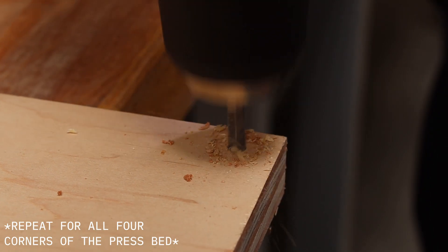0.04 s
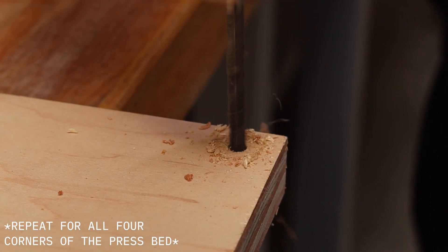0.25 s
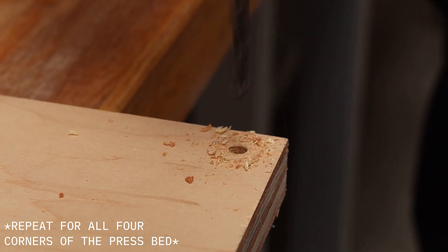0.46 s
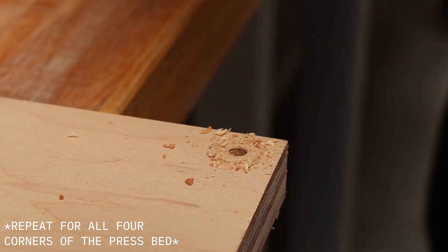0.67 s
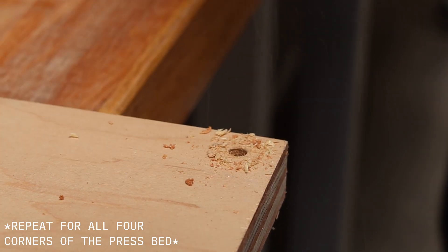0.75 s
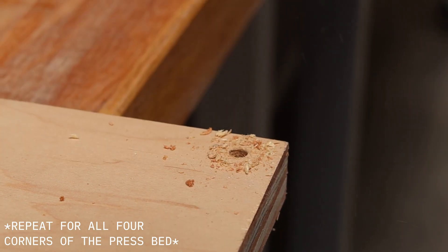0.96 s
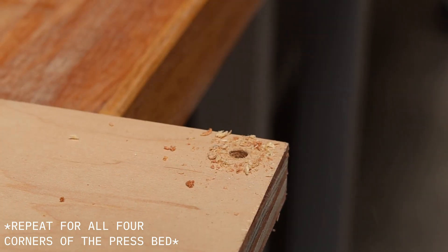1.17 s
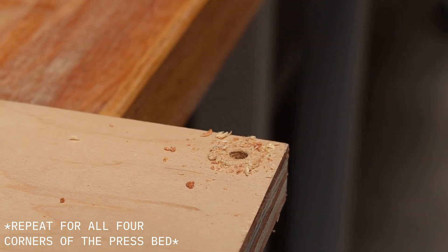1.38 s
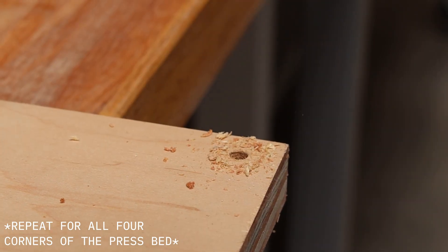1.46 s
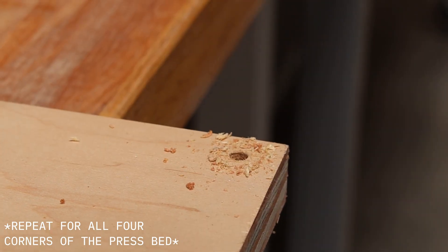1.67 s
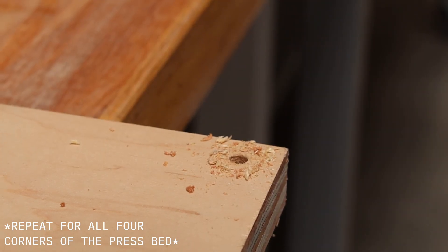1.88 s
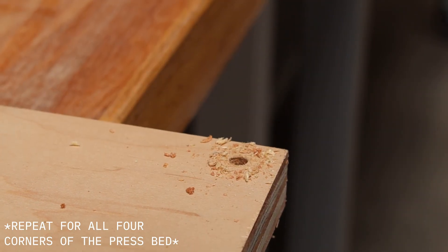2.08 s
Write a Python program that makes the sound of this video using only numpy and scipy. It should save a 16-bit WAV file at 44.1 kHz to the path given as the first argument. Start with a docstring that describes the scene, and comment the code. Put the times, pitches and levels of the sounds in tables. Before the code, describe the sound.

Close up in a quiet workshop, an electric drill whirs briefly, its bit rubbing in wood, then slows and clacks to a halt. The room rings a little, and faint handling ticks and rustling follow over low ventilation.

```python
"""A hand drill backing out of a hole in plywood, close to the microphone in a quiet workshop.
The motor whines over gear chatter, with the rub of the bit and a low rumble while it is in the wood.
The trigger is let go, the speed sags and the brake stops the chuck with a few clacks. The room rings on;
soft handling ticks and a rustle follow, over a room tone of ventilation and faint hiss."""
import sys
import numpy as np
from scipy import signal
from scipy.fft import rfft, irfft
from scipy.io import wavfile

SR = 44100
rng = np.random.default_rng(int(sys.argv[2]) if len(sys.argv) > 2 else 0)


def file_out(sig):
    """Save sig as 16-bit WAV at sys.argv[1]."""
    # one column per channel
    cols = np.atleast_2d(sig).T
    # limit, then scale
    lim = np.clip(cols, -1, 1)
    pcm = np.round(lim * 32767).astype(np.int16)
    wavfile.write(sys.argv[1], SR, pcm)


N = 94109
TIME = np.arange(N) / SR
WHINE_ORDER, TONE_PAN_DB = 12, 3.5  # whine cycles per shaft turn; the tones sit left of centre


def undb(db):
    """Decibels to gain."""
    return 10 ** (np.asarray(db) / 20)


def unit(x):
    """Scale to rms 1."""
    return x / np.sqrt(np.mean(x ** 2))


def curve(rows):
    """Join (time_s, value) points by straight lines."""
    return np.interp(TIME, *np.array(rows, float).T)


def freqs():
    """Frequency of every spectrum bin."""
    return np.maximum(np.arange(N // 2 + 1) * SR / N, 1)


def spread(rows):
    """Join (freq_hz, value) points on a log-frequency axis."""
    hz, value = np.array(rows, float).T
    return np.interp(np.log(freqs()), np.log(hz), value)


def shape(x, gain):
    """Filter by a gain for every frequency."""
    return irfft(rfft(x) * gain, N)


def causal(db):
    """A response with this dB shape that rings only after the blow."""
    cepstrum = irfft(db * np.log(10) / 20, N)
    cepstrum[1:N // 2] *= 2
    cepstrum[N // 2:] = 0
    return np.exp(rfft(cepstrum))


def rings(modes):
    """Response of a set of (freq_hz, width_hz, gain_db) resonances."""
    f = freqs()
    return sum(undb(db) / (1 + 1j * (f * f - hz * hz) / (f * width)) for hz, width, db in modes)


def noise():
    """White noise."""
    return rng.standard_normal(N)


def coloured(spectrum):
    """Noise of rms 1 with a (freq_hz, level_db) spectrum."""
    return unit(shape(noise(), undb(spread(spectrum))))


def walk(rate_hz):
    """A smooth random drift of rms 1."""
    return unit(shape(noise(), np.exp(-(freqs() / rate_hz) ** 2)))


def pan(x, db):
    """Place a sound left (+) or right (-)."""
    return np.array([x * undb(db / 2), x * undb(-db / 2)])


def near(mid, side):
    """Close to the microphone: a little to the left, diffuse in bass and high treble."""
    # stereo width: freq_hz, side_gain_db
    width = [(60, -0.5), (300, -4.5), (700, -12.5), (1300, -19), (4500, -16.5), (8000, -6), (15000, -2)]
    # stereo balance: freq_hz, left_over_right_db
    balance = [(200, 1.5), (700, 3), (1290, -0.5), (2380, 1.5), (4400, 3.5), (8000, 2.5), (15000, -2)]
    diffuse, lean = shape(side, undb(spread(width))), spread(balance)
    return np.array([shape(mid, undb(lean / 2)) + diffuse, shape(mid, undb(-lean / 2)) - diffuse])


def rasp(load, colour, per_s=22000, scatter_db=2):
    """Dense tiny impacts of uneven size, stronger under load, filtered by a colour."""
    grains = noise() * (rng.random(N) < per_s / SR) * undb(scatter_db * noise())
    return unit(shape(load * grains, colour))


def shaft_turns():
    """Running count of motor turns: the speed climbs, then sags as the trigger is let go."""
    # motor speed, heard as the whine: time_s, pitch_hz
    whine_pitch = [(0, 3840), (.024, 4100), (.06, 4310), (.108, 4440), (.166, 4504), (.236, 4537),
                   (.34, 4547), (.39, 4575), (.445, 4575), (.53, 4138), (.59, 3800)]
    jitter = 1 + 0.00096 * walk(85)
    return np.cumsum(curve(whine_pitch) / WHINE_ORDER * jitter) / SR


def motor_whine(turns, turns_per_chuck_turn=11.5):
    """Motor and gears sing at multiples of the shaft rate and throb once per chuck turn."""
    # loudness of the whine: time_s, level_db
    whine_level = [(0, -39.5), (.03, -36.5), (.115, -42), (.15, -39), (.25, -37.5), (.36, -39),
                   (.46, -42.5), (.52, -40), (.57, -45), (.59, -53)]
    # weaker motor and gear tones: cycles_per_turn
    orders = (4, 6, 7, 10, 11, 15, 19, 20, 21, 24, 25, 26, 28, 30, 35, 36)
    # their strength against the whine: level_db
    order_levels = [-21, -17, -17.5, -18, -23, -17.5, -32, -26, -32, -26.5, -34.5, -28.5, -35.5, -28, -32,
                    -32.5]
    tones = np.zeros(N)
    for order, db in [(WHINE_ORDER, 0), *zip(orders, order_levels)]:
        flutter_db = (0.14 if order == WHINE_ORDER else 2) * walk(50)
        tones += undb(db + flutter_db) * np.sin(2 * np.pi * (order * turns + rng.random()))
    throb_db = 0.5 * np.sin(2 * np.pi * turns / turns_per_chuck_turn)
    return np.sqrt(2) * tones * undb(curve(whine_level) + throb_db)


def gear_chatter(load, bit_out_s=0.22, fade_s=0.53):
    """Teeth chatter and brushes hiss; the housing's resonances come up as the bit runs free."""
    # colour of gears and brushes: freq_hz, level_db
    spectrum = [(88, -59), (150, -34), (436, -16), (519, -24), (668, -19.5), (1040, -10), (1480, -4),
                (1660, -11), (2230, -3.5), (3620, -5), (4480, -5.5), (4840, -6.5), (8490, -22),
                (13300, -21.5), (15500, -41)]
    # their loudness: time_s, level_db
    level = [(0, -39.5), (.15, -40), (.3, -40.5), (.42, -41.5), (.52, -44), (.59, -45)]
    # housing resonances: freq_hz, width_hz, gain_db
    housing_modes = [(1387, 460, -1.5), (1915, 220, 4), (2216, 290, -6.5), (2680, 300, -6)]
    housing = sum(undb(db) * abs(rings([(hz, width, 0)])) ** 2 for hz, width, db in housing_modes)
    free = np.clip((TIME - bit_out_s) / fade_s + .5, 0, 1)
    teeth = rasp(load, undb(spread(spectrum))) * undb(curve(level))
    return teeth + rasp(load, housing) * undb(-45) * free


def bit_in_wood(load, fall_db_per_s=44.5):
    """The rising bit rubs up one board resonance after another while the scrape of its flutes fades."""
    # board resonances: freq_hz, width_hz, level_db, strongest_s, span_s
    board_modes = [(726, 65, -44.5, 0.0033, 0.021), (880, 38, -49, 0.072, 0.049),
                   (1774, 90, -46.5, 0.034, 0.098), (1485, 190, -45.5, 0.21, 0.089),
                   (680, 35, -55.5, 0.28, 0.11), (2610, 110, -48.5, .18, 0.073),
                   (4930, 420, -50, 0.16, .13)]
    # low scrape of the flutes: freq_hz, width_hz, gain_db
    flutes = [(210, 350, -8), (580, 750, 7)]
    rubbing = sum(rasp(load, rings([(hz, width, 0)])) * undb(db) * np.exp(-((TIME - at) / span) ** 2)
                  for hz, width, db, at, span in board_modes)
    return rubbing + rasp(load, rings(flutes)) * undb(-49 - fall_db_per_s * TIME)


def rumble(clear_s=0.357):
    """A low rumble that drops to a trace once the bit is clear of the wood."""
    # colour of the rumble: freq_hz, level_db
    spectrum = [(20, -3), (55, 2), (110, -7), (250, -12.5), (500, -18), (1500, -86)]
    in_wood = np.clip((clear_s - TIME) / 0.01 + .5, 0, 1)
    return coloured(spectrum) * (undb(-84.5) + undb(-57.5) * in_wood)


def room_tone():
    """The low murmur of ventilation and a faint hiss."""
    # colour of the background: freq_hz, level_db
    spectrum = [(15, -34), (25, -7.5), (188, 0.5), (260, -5), (368, 0), (457, -5.5), (523, -4.5),
                (631, -7.5), (895, -7), (1490, -12.5), (2800, -16), (5000, -17.5), (6800, -29),
                (10000, -28.5), (15500, -30.5)]
    # its loudness: time_s, level_db
    level = [(.5, -78), (.85, -73.5), (1.2, -68.5), (1.65, -67.5), (2.13, -68)]
    # its stereo width: freq_hz, side_gain_db
    width = [(50, 6.5), (200, -5), (600, -3), (4000, -5.5), (12000, -2.5)]
    mid = coloured(spectrum)
    side = shape(coloured(spectrum), undb(spread(width)))
    return (pan(mid, db=2) + np.array([side, -side])) * undb(curve(level) + 0.5 * walk(23))


def hum(pitch_hz=196, peak_s=0.416, span_s=0.067):
    """A short hum as the bit comes clear."""
    swell = np.exp(-((TIME - peak_s) / span_s) ** 2)
    return undb(-64) * swell * np.sin(2 * np.pi * pitch_hz * TIME)


def drill(brake_s=0.5973, whine_decay_s=0.004, grind_decay_s=0.014):
    """Whine and grinding follow the motor; the brake cuts the whine and the gears run out just after."""
    turns = shaft_turns()
    braking_s = np.maximum(TIME - brake_s, 0)
    whine = motor_whine(turns) * np.exp(-braking_s / whine_decay_s)
    load = 1 + 0.3 * np.sin(2 * np.pi * turns)  # pulses once per motor turn
    mid, side = (gear_chatter(load) + bit_in_wood(load) + rumble() for _ in range(2))
    grind = near(mid, side) * np.exp(-braking_s / grind_decay_s)
    return pan(whine + hum(), TONE_PAN_DB), grind


def knocks(contacts, body, modes, attack_s, grit):
    """Each contact rings a body with a sharp tap and a brief crackle; grit 1 is all crackle."""
    mid_side = np.zeros((2, N))
    for start_s, db, decay_s, tilt_db in contacts:
        age = np.maximum(TIME - start_s, 0)
        push = (1 - np.exp(-age / attack_s)) * np.exp(-age / decay_s)
        push /= push.max()
        tap = np.arange(N) == int(start_s * SR)
        octaves = np.log2(np.maximum(freqs(), 100) / 3000)
        response = causal(spread(body) + tilt_db * octaves) * (1 + rings(modes))
        response *= undb(db) * np.sqrt(np.sum(push ** 2) / np.mean(abs(response) ** 2))
        for part in mid_side:
            crackle = push * noise()
            crackle /= np.sqrt(np.sum(crackle ** 2))
            part += shape(grit * crackle + np.sqrt(1 - grit ** 2) * tap, response)
    return near(*mid_side)


def brake_clacks():
    """Gear teeth clash as the brake bites, then rattle in their play."""
    # tooth contacts: start_s, level_db, decay_s, tilt_db_per_octave
    clacks = [(.5913, -26.5, 0.0014, 0.5), (.5987, -29.5, 0.0006, 0), (.6200, -39.5, 0.00085, -1.5),
              (.6530, -55.5, 0.00084, 0), (.6728, -50.5, 0.0019, -2)]
    # gearbox body: freq_hz, gain_db
    gearbox = [(100, -28), (330, -21.5), (500, -4), (750, -7.5), (1000, 1), (1400, -4), (3100, -1.5),
               (4400, 1.5), (5900, -2), (6800, -6.5), (9000, -12), (13500, -15.5), (16000, -21)]
    # gearbox resonances: freq_hz, width_hz, gain_db
    modes = [(495, 43, -8), (1820, 93, 5), (3030, 280, 7), (7400, 180, -4), (10740, 260, 0)]
    return knocks(clacks, gearbox, modes, attack_s=0.0017, grit=0.93)


def chuck_snap():
    """The chuck snaps to a stop and rebounds."""
    # stop and rebound: start_s, level_db, decay_s, tilt_db_per_octave
    snaps = [(.6258, -22, 0.00032, 2.6), (.6278, -31, 0.00084, -1.5)]
    # chuck body: freq_hz, gain_db
    chuck = [(60, -15), (300, -15), (500, -15), (720, -3), (1100, -11), (1800, 0), (3000, -3), (4400, -5),
             (5100, 1), (6100, -5), (7500, -21.5), (13000, -24), (16000, -29)]
    # chuck resonances: freq_hz, width_hz, gain_db
    modes = [(1420, 110, 3), (1820, 130, 7), (2540, 150, 9), (2960, 180, 7.5), (5300, 700, -9)]
    return knocks(snaps, chuck, modes, attack_s=0.00039, grit=0.3)


def workshop_tail(send):
    """The workshop returns a diffuse tail that lasts longest in the upper middle range."""
    # reverberation bands: freq_hz, gain_db, t60_s
    bands = [(150, -29, 0.44), (710, -15, 1.5), (1380, -17, 1.28), (2660, -18.5, 1.2), (4200, -13.5, 1.6),
             (5600, -15, 1.74), (7240, -17, 1.16), (14000, -22, 0.57)]
    tails = np.zeros((2, N))
    for tail in tails:
        wash = noise()
        for hz, db, t60_s in bands:
            band = spread([(centre_hz, centre_hz == hz) for centre_hz, _, _ in bands])
            fade = undb(-60 * TIME / t60_s)
            tail += undb(db) * shape(wash, band) * fade / np.sqrt(np.sum(fade ** 2))
    mid, side = (signal.fftconvolve(send, tail)[:N] for tail in tails)
    return pan(mid, db=3.5) + undb(-4) * np.array([side, -side])


def lingering_ring(pitch_hz=4572, peak_s=0.925, span_s=0.062):
    """A thin ring at the top note of the whine swells once in the tail of the room."""
    swell = np.exp(-((TIME - peak_s) / span_s) ** 4)
    return pan(undb(-72.5) * swell * np.sin(2 * np.pi * pitch_hz * TIME), TONE_PAN_DB)


def handling_ticks():
    """Small handling contacts tick close to the microphone."""
    # light contacts: start_s, level_db, decay_s, tilt_db_per_octave
    ticks = [(1.148, -61.5, 0.0011, -1), (1.184, -63, 0.00095, -4), (1.206, -61, 0.00064, -2),
             (1.226, -63, 0.0027, -5), (1.310, -61.5, 0.0018, 5), (1.374, -55, 0.0018, -2)]
    # the body they ring: freq_hz, gain_db
    body = [(100, -11), (700, -8), (2400, 11), (4500, -15), (9000, -17), (16000, -33)]
    # its resonance: freq_hz, width_hz, gain_db
    modes = [(2110, 930, -1)]
    return knocks(ticks, body, modes, attack_s=0.00046, grit=0.95)


def rustle():
    """A soft sliding rustle, as of a sleeve, after the drill has stopped."""
    # colour of the rustle: freq_hz, level_db
    spectrum = [(200, -16), (600, -6.5), (1400, 2.5), (3200, 2), (4800, 4), (6800, -4), (9000, -12),
                (12500, -18), (15500, -23)]
    # its loudness: time_s, level_db
    level = [(1.2, -82), (1.32, -66.5), (1.35, -68), (1.41, -62), (1.45, -62), (1.51, -65), (1.55, -71.5),
             (1.7, -78.5), (1.9, -84)]
    return near(coloured(spectrum), coloured(spectrum)) * undb(curve(level))


def scene():
    """Drill, brake and handling noises up close, with the workshop behind them."""
    whine, grind = drill()
    stop = brake_clacks() + chuck_snap()
    handling = handling_ticks() + rustle()
    direct = whine + grind + stop + handling
    send = undb(-6.5) * whine + grind + undb(-4) * stop + handling
    return direct + workshop_tail(send.mean(axis=0)) + lingering_ring() + room_tone()


def record(dry, top_hz=15600):
    """The recorder cuts the top treble steeply."""
    return signal.sosfilt(signal.ellip(8, .2, 70, top_hz, fs=SR, output="sos"), dry)


dry = scene()
out = record(dry)
file_out(out)
```